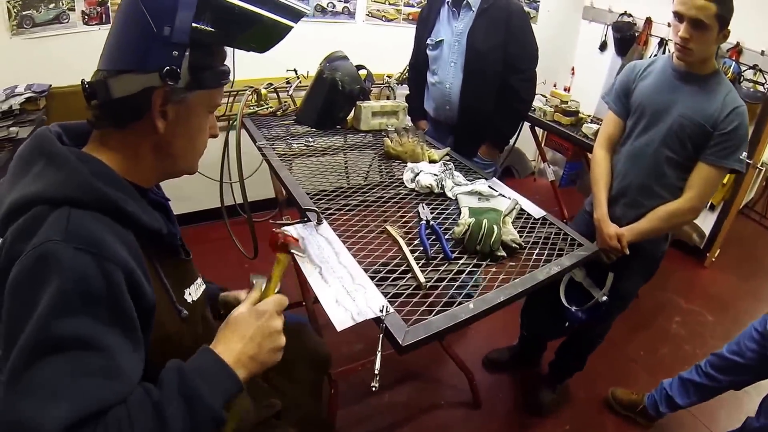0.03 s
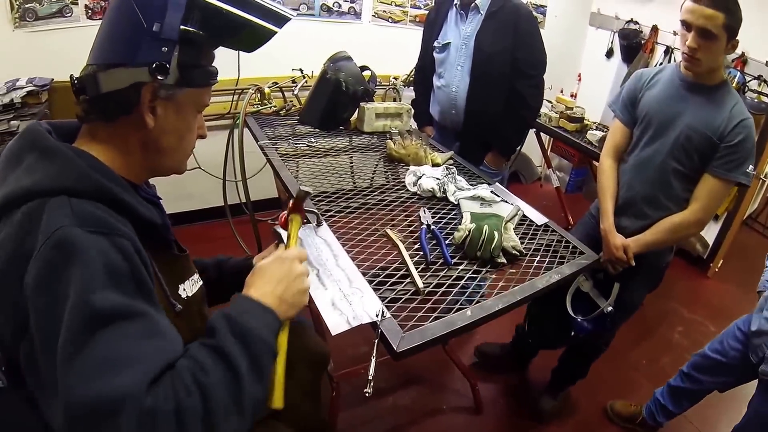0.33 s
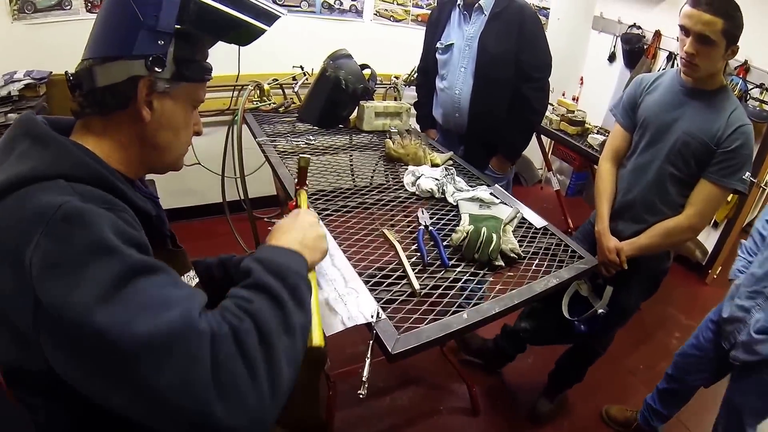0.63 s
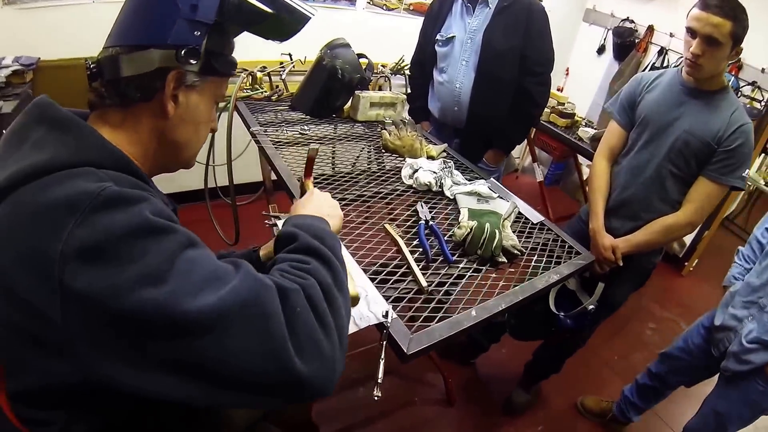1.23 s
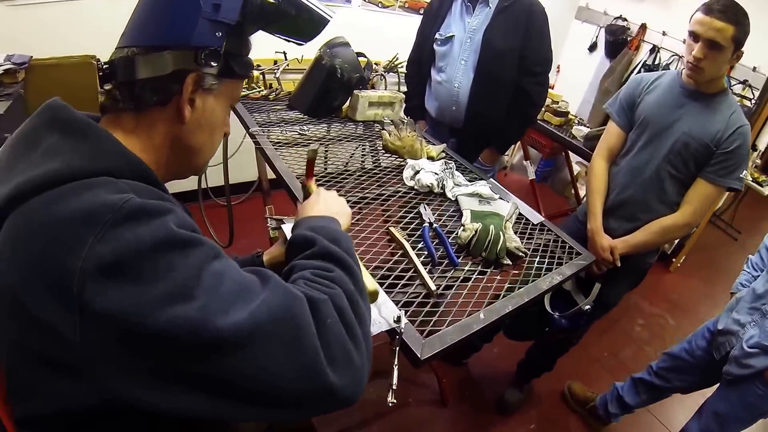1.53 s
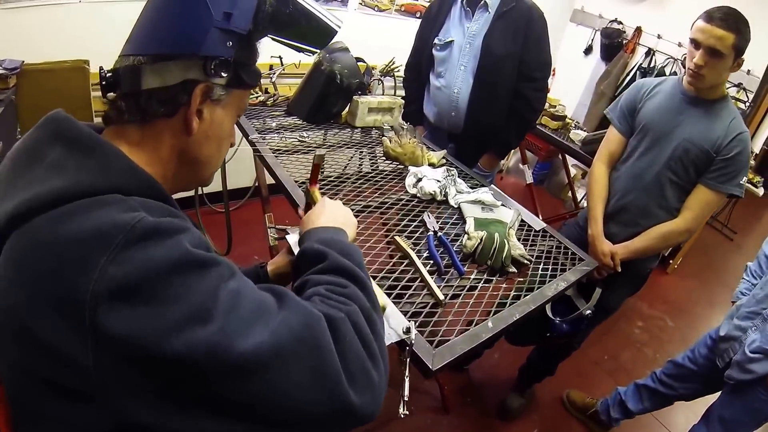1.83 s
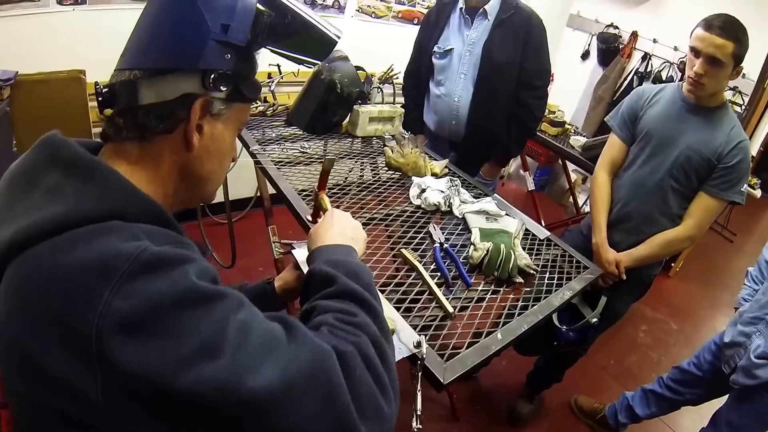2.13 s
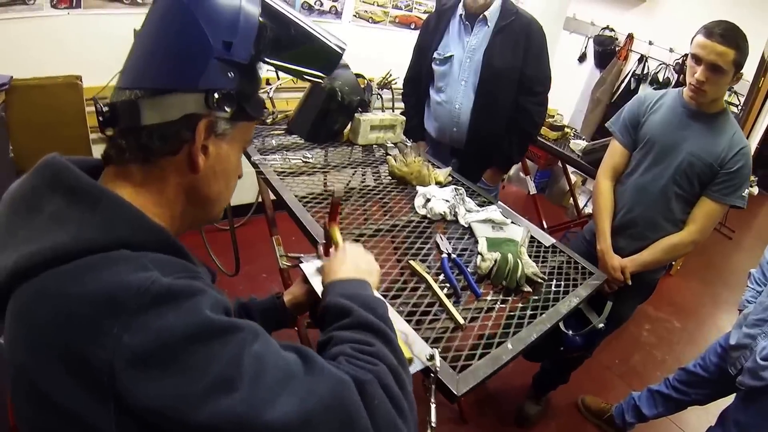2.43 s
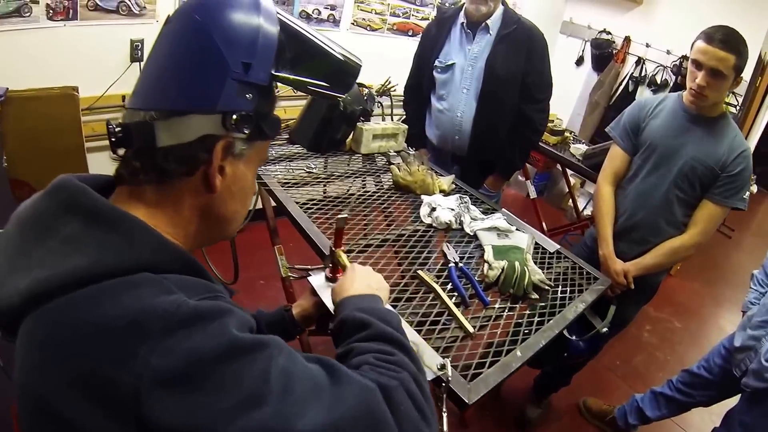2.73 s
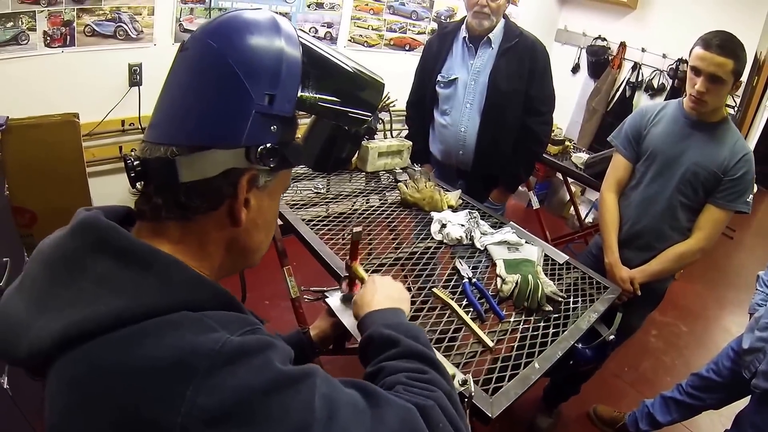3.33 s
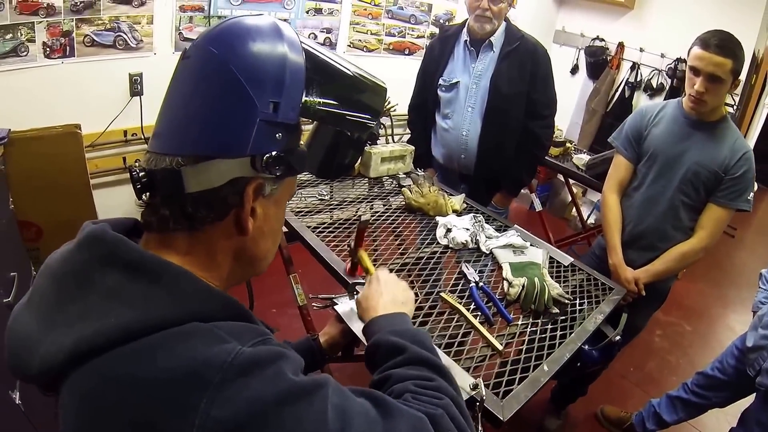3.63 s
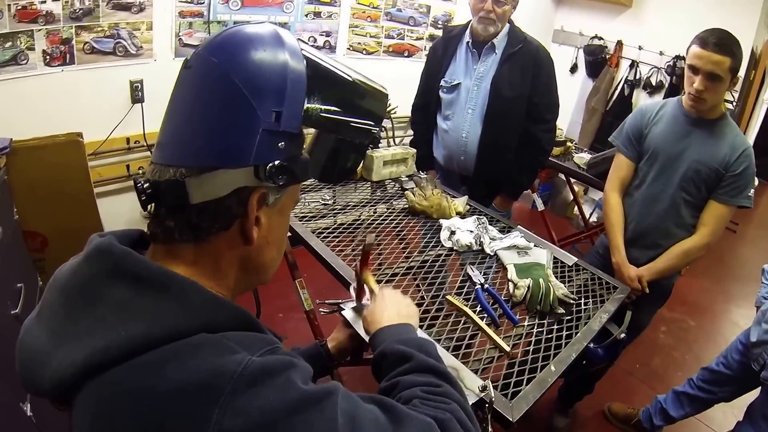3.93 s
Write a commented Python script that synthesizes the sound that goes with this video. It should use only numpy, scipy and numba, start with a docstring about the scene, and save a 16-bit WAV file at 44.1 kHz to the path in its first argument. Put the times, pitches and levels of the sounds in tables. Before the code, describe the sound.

Sharp, ringing hammer blows on steel, with loose metal clattering in a quiet workshop.

```python
"""Quiet workshop air and a thin whine, then a hammer: one light tap and ten blows on a small steel piece.
Each blow cracks, rings the steel and shakes the steel-mesh workbench under it; after most of them, some
60 ms later, the loose metal drops back and clatters. Twice the steel slides with a short scrape.
The sound is close and nearly mono. A camera's limiter ducks hard at every blow, and its DC offset
follows the gain and makes soft thumps."""
import sys
import numpy as np
from scipy import signal
from scipy.fft import rfft, irfft
from scipy.io import wavfile
from scipy.ndimage import uniform_filter1d, minimum_filter1d
from numba import njit

SR = 44100
rng = np.random.default_rng(int(sys.argv[2]) if len(sys.argv) > 2 else 0)


def pcm_store(signal):
    """Save signal as 16-bit PCM."""
    levels = np.round(np.clip(np.atleast_2d(signal), -1, 1) * 32767)
    wavfile.write(sys.argv[1], SR, levels.astype(np.int16).T)


N = 176400


def undb(db):
    """Decibels to gain."""
    return 10 ** (np.asarray(db) / 20)


def unit(x):
    """Scale to rms 1."""
    return x / np.sqrt(np.mean(x ** 2) + 1e-20)


def add(out, start_s, x):
    """Mix x into out from start_s on."""
    i = max(int(start_s * SR), 0)
    out[i:i + len(x)] += x[:max(len(out) - i, 0)]


def noise(spectrum, size, tilt=0):
    """Noise of rms 1 with the given spectrum, tilted in dB per octave above about 1 kHz."""
    hz, db = np.array(spectrum).T
    octave = np.log2(np.maximum(np.fft.rfftfreq(size, 1 / SR), 20))
    colour = np.interp(octave, np.log2(hz), db) + tilt * np.maximum(octave, 10)
    return unit(irfft(rfft(rng.standard_normal(size)) * undb(colour - colour.max()), size))


def envelope(t, rise_s, hold_s, t60_s):
    """Straight attack; exponential release from hold_s on."""
    return np.minimum(t / rise_s, 1) * np.exp(-np.log(1000) * np.maximum(t - hold_s, 0) / t60_s)


def ring(modes, t, scatter_db=7.5):
    """Decaying modes that start at rms 1 together, balanced differently at every contact."""
    hz, db, t60_s = np.array(modes).T[:, :, None]
    size = undb(db + scatter_db * rng.standard_normal(db.shape))
    phase = 2 * np.pi * (hz * t + rng.random(db.shape))
    partials = size * np.sin(phase) * np.exp(-np.log(1000) * t / t60_s)
    return partials.sum(0) / np.sqrt((size ** 2).sum() / 2)


def rattle(spectrum, t, tilt=0, chatter_hz=706.6, depth_db=3.5):
    """The mesh's dense ringing, broken up by its wires chattering."""
    chatter = np.interp(t * chatter_hz, np.arange(len(t)), rng.standard_normal(len(t)))
    return unit(noise(spectrum, len(t), tilt) * undb(depth_db * chatter))


# Colour of the room's air: freq_hz, density_db
AIR_SPECTRUM = [(30, 18.5), (100, 1), (300, 2.5), (700, -4.5), (1500, -11), (2200, -13), (3200, -8),
                (4500, -15), (8000, -19.5), (13000, -21), (15500, -26)]
# Colour of the faint low noise in the side channel: freq_hz, density_db
SIDE_NOISE_SPECTRUM = [(20, -7), (50, -7), (120, -25), (250, -47), (600, -50), (2000, -42), (15500, -48)]
ROOM_WIDTH = 0.04  # side-to-mid gain of air and reverb

def background(air_db=-50.5, whine_hz=10660, whine_db=-65.5, side_noise_db=-51.5):
    """The bed as mid and side: air, an electrical whine, and faint low side noise for slight width."""
    whine = undb(whine_db) * np.sqrt(2) * np.sin(2 * np.pi * whine_hz * np.arange(N) / SR)
    side_noise = undb(side_noise_db) * noise(SIDE_NOISE_SPECTRUM, N)
    mid = undb(air_db) * noise(AIR_SPECTRUM, N) + whine
    side = ROOM_WIDTH * undb(air_db) * noise(AIR_SPECTRUM, N) + side_noise
    return mid, side


# Hammer hits, cueing the crack, bench and steel layers: start_s, crack_db, tilt_db_per_octave,
# ping_db, rattle_db, bench_tones_db, ring_db, ring_t60_s, lower_mode_db
HAMMER_BLOWS = [(0.3386, -24.5, 1.5, -24, -29, -34.5, -60.5, 0.14, -8),
                (1.0807, -3, 10.5, -26, -2.5, -17, -21, 0.075, -6),
                (1.3648, -1.5, -2, -18, 3, -17, -34, .08, -16),
                (1.6413, 4, 9, -1.5, -1, -12, -8.5, 0.25, -10),
                (1.9073, 5.5, 1, -0.5, -2.5, -15.5, -3.5, 0.21, -33),
                (2.4179, 7.5, 5, -1, -3, -16, -12, 0.15, -7),
                (2.6912, 16, 1.5, 19.5, -6.5, -6.5, -5.5, 0.91, -34),
                (2.9423, 6, 1, 1.5, -2, -17.5, -5, 0.12, -12),
                (3.1777, 7.5, 0.5, 9, -1.5, -13.5, 1.5, 0.11, -14),
                (3.6577, 5, 0, 4, -2, -7.5, -6, 0.26, 9), (3.912, 3, -4.1, 3, -4.5, -15, -14.5, 0.25, -10)]
# Colour of the crack: freq_hz, density_db
CRACK_SPECTRUM = [(100, -9), (500, -9), (1100, -6.5), (1600, -14), (2400, 9.5), (3400, -0.5), (5000, 2.5),
                  (7500, -3), (11000, -18), (15500, -19)]
HIT_RISE_S = 0.0009

def hammer_cracks(t, ping_hz=3418, ping_spread=0.067):
    """The transient: each blow's hard contact, with the hammer head's very short ping."""
    out = np.zeros(N)
    contact = envelope(t, HIT_RISE_S, hold_s=0.0016, t60_s=0.0058)
    for start_s, crack_db, tilt, ping_db, *_ in HAMMER_BLOWS:
        crack = unit(noise(CRACK_SPECTRUM, len(t), tilt) * contact) * np.sqrt(np.mean(contact ** 2))
        pitch_hz = ping_hz * (1 + ping_spread * (rng.random() - .5))
        ping = np.sqrt(2) * np.sin(2 * np.pi * pitch_hz * t) * contact
        add(out, start_s, undb(crack_db) * crack + undb(ping_db) * ping)
    return out


# Colour of the shaken mesh: freq_hz, density_db
MESH_SPECTRUM = [(100, -34), (170, -21.5), (260, -4), (370, -13.5), (500, -3.5), (650, -15), (1150, 1),
                 (1550, -3.5), (2300, 0.5), (3400, 2), (4600, -1), (7500, -3.5), (11000, -14), (15500, -21)]
# Tones of the bench frame: pitch_hz, relative_db, t60_s
BENCH_MODES = [(239.8, -10.5, 0.29), (303, -8, 0.14), (476, 2, 0.14), (789.5, -5, 0.26), (1000, 2, 0.067),
               (1073, -3, 0.26), (1158, -11.5, 0.51), (1230, 2, 0.23), (1307, -8, 0.29), (1750, -10, 0.26),
               (2150, -4.5, 0.41), (2655, -31, 0.75), (3520, 10.5, 0.11), (3956, 7, 0.16)]

def bench_shake(t):
    """The body: each blow shakes the mesh and rings the frame."""
    out = np.zeros(N)
    for start_s, _, _, _, rattle_db, tones_db, *_ in HAMMER_BLOWS:
        mesh = rattle(MESH_SPECTRUM, t) * envelope(t, HIT_RISE_S, hold_s=0, t60_s=0.081)
        add(out, start_s, undb(rattle_db) * mesh + undb(tones_db) * ring(BENCH_MODES, t))
    return out


# Partials of the steel piece: pitch_hz, relative_db, share_of_ring_t60
STEEL_MODES = [(3144, 10.5, 1), (3162, -23, .6), (3470, -22, .3), (5670, -40, .4)]

def steel_ring(t, rise_s=0.0046, lower_hz=2945, linger_hz=3143, linger_db=-23):
    """The struck piece rings on two close pitches until the grip damps it; a faint note lingers."""
    out = np.zeros(N)
    linger = undb(linger_db) * np.sin(2 * np.pi * linger_hz * t)
    linger *= envelope(t, rise_s, hold_s=0, t60_s=1.23)
    for start_s, *_, ring_db, t60_s, lower_db in HAMMER_BLOWS:
        # The lower bending mode's strength depends on where the blow lands.
        modes = np.vstack([np.array(STEEL_MODES) * [1, 1, t60_s], [lower_hz, lower_db, t60_s]])
        note = ring(modes, t, scatter_db=1) * np.minimum(t / rise_s, 1)
        add(out, start_s, undb(ring_db) * (note + linger))
    return out


# Loose metal falling back on the mesh:
# start_s, touch_db, landing_delay_s, landing_db, tilt_db_per_octave, bench_tones_relative_db
METAL_DROPS = [(.428, -56, 0.012, -39.5, -3.5, -15), (1.125, -12, .007, -9.5, 1, -21),
               (1.4234, -8, 0.015, -9.5, 1.5, -11), (1.712, -7, 0.015, -7, 1.5, -11),
               (1.975, -12.5, .012, -9, 1, -12), (2.469, -15.5, .015, -11.5, 0.5, -12),
               (2.992, -15, 0.014, -11.5, 0.5, -35), (3.236, -16.5, .018, -7.5, -0.5, -14.5),
               (3.715, -11, 0.014, -8, 0.5, -11.5), (3.971, -12.5, 0.014, -13.5, -0.5, -24)]
# Colour of the clatter: freq_hz, density_db
CLATTER_SPECTRUM = [(100, -29), (170, -24), (260, -14.5), (480, -11), (600, -5.5), (800, -0.5), (1200, 1),
                    (1550, -4), (2300, 1.5), (3500, 1), (4600, -5.5), (7500, -10), (11000, -19),
                    (15500, -28)]

def metal_drops(t, rise_s=0.00083, t60_s=0.14, steel_db=-10.5, rebound_db=-10, rebound_rise_s=0.0094):
    """Loose metal touches the mesh, lands on it fully and settles with a softer rebound."""
    out = np.zeros(N)
    steel_modes = np.array(STEEL_MODES) * [1, 1, t60_s]
    for touch_s, touch_db, delay_s, landing_db, tilt, tones_db in METAL_DROPS:
        landing_s = touch_s + delay_s
        rebound_s = landing_s + rng.uniform(0.030, 0.044)
        contacts = [(touch_s, touch_db, rise_s), (landing_s, landing_db, rise_s),
                    (rebound_s, landing_db + rebound_db, rebound_rise_s)]
        for start_s, level_db, attack_s in contacts:
            fade = envelope(t, attack_s, hold_s=0.0017, t60_s=t60_s)
            clatter = rattle(CLATTER_SPECTRUM, t, tilt) * fade
            note = undb(steel_db) * ring(steel_modes, t)
            frame = undb(tones_db) * ring(BENCH_MODES, t)
            add(out, start_s, undb(level_db) * (clatter + note + frame))
    return out


# Scrape cues: start_s, length_s, level_db
STEEL_SLIDES = [(0.906, 0.045, -43.5), (2.814, 0.1, -17.5)]
# Colour of the scrape: freq_hz, density_db
SLIDE_SPECTRUM = [(200, -26), (1500, -9), (2600, -9), (3400, 5), (4500, -12.5), (8000, -25.5), (15500, -47)]

def steel_slides(t):
    """Short gritty scrapes as steel shifts on steel."""
    out = np.zeros(N)
    for start_s, length_s, level_db in STEEL_SLIDES:
        fade = envelope(t, rise_s=0.0046, hold_s=length_s / 4, t60_s=length_s * 4)
        add(out, start_s, undb(level_db) * rattle(SLIDE_SPECTRUM, t) * fade)
    return out


# The workshop's tail, band by band: centre_hz, t60_s, level_db
REVERB_BANDS = [(150, 0.31, 6.5), (500, 0.7, -9.5), (1120, 0.79, -11), (3100, 0.88, -12), (5870, 0.88, -20),
                (9800, 0.47, -16), (15000, 0.44, -15)]

def workshop_reverb(send, t):
    """Diffuse reverberation of the room, shorter in the bass and the high treble."""
    hz, t60_s, db = np.array(REVERB_BANDS).T
    octave = np.log2(np.maximum(np.fft.rfftfreq(len(t), 1 / SR), 1))
    white, tail = rfft(rng.standard_normal(len(t))), 0
    for k, share in enumerate(np.eye(len(hz))):
        fade = envelope(t, rise_s=0.03, hold_s=0, t60_s=t60_s[k])
        band = irfft(white * np.interp(octave, np.log2(hz), share), len(t))
        tail = tail + undb(db[k]) * band * fade / np.sqrt(np.sum(fade ** 2))
    return signal.fftconvolve(send, tail)[:N]


def scene():
    """The mix: close hammering and its reverb over the quiet bed, in narrow stereo."""
    crack_send_db, steel_send_db, direct_width = -2, -1.5, 0.015
    t = np.arange(SR) / SR
    cracks = hammer_cracks(t[:SR // 10])
    steel = steel_ring(t)
    body = bench_shake(t[:SR // 2]) + metal_drops(t[:SR // 2]) + steel_slides(t)
    direct = cracks + steel + body
    send = undb(crack_send_db) * cracks + undb(steel_send_db) * steel + body
    bed_mid, bed_side = background()
    direct_side = direct_width * np.imag(signal.hilbert(direct))  # slightly widens the close sound
    mid = direct + workshop_reverb(send, t) + bed_mid
    side = direct_side + ROOM_WIDTH * workshop_reverb(send, t) + bed_side
    return np.array([mid + side, mid - side])


@njit
def recover(allowed, rate_per_s, base):
    """Gain that drops at once and climbs back slowly."""
    out, gain = np.empty(len(allowed)), 1.
    for i in range(len(allowed)):
        gain = min(allowed[i], gain + rate_per_s * (gain + base) / SR)
        out[i] = gain
    return out


def limiter_gain(mono, limit_db=-4.5, lookahead_s=0.014, hold_s=0.07, attack_s=0.00052):
    """The limiter ducks just ahead of each loud hit, holds, then lets go."""
    rms = np.sqrt(np.maximum(uniform_filter1d(mono ** 2, size=88), 1e-12))  # over 2 ms
    ahead, hold = int(lookahead_s * SR), int(hold_s * SR)
    span = ahead + hold + 1
    allowed = minimum_filter1d(np.minimum(undb(limit_db) / rms, 1), span, origin=hold - span // 2)
    block = 147  # samples per gain step
    allowed = np.repeat(allowed.reshape(-1, block).min(1), block)
    duck = 1 - recover(allowed, rate_per_s=1.45, base=0.22)
    pole = np.exp(-1 / (attack_s * SR))
    return 1 - signal.lfilter([1 - pole], [1, -pole], duck)


def record(dry):
    """The limiter ducks sound and DC offset alike, which thumps; the peaks clip and the top is cut."""
    ceiling, top_hz = undb(-0.2), 15400
    dc_offset = np.array([[0.38], [0.41]])  # left, right
    ducked = (dry + dc_offset) * limiter_gain(dry.mean(0))
    clipped = np.clip(ducked, -ceiling, ceiling)
    lowpass = signal.ellip(8, .2, 70, top_hz, fs=SR, output="sos")
    return dc_offset + signal.sosfilt(lowpass, clipped - dc_offset)


dry = scene()
out = record(dry)
pcm_store(out)
```